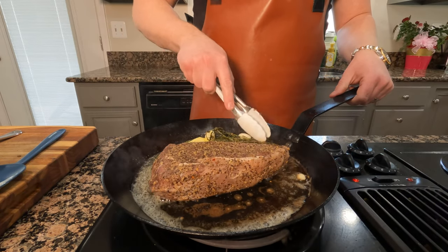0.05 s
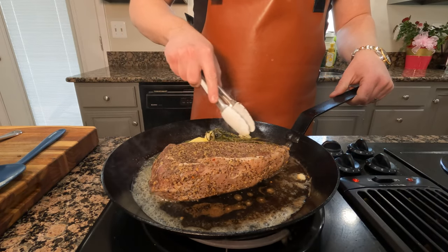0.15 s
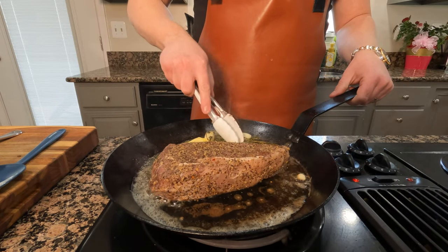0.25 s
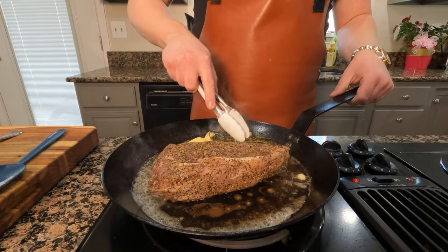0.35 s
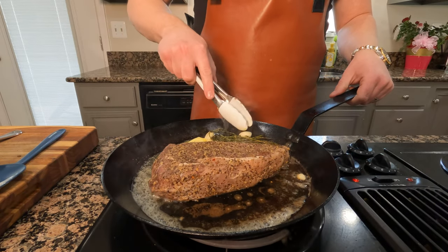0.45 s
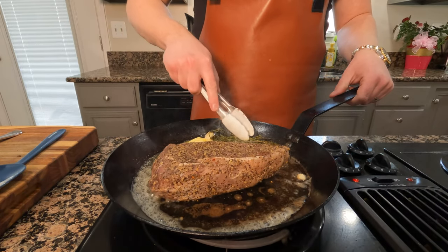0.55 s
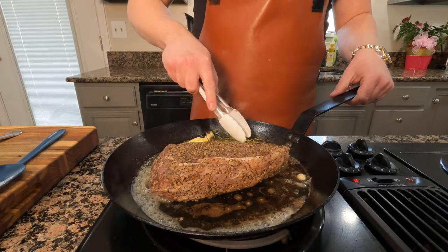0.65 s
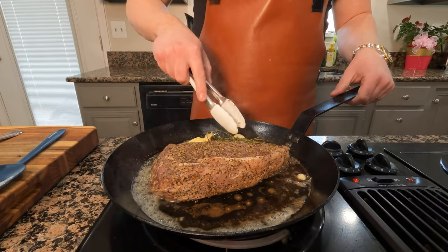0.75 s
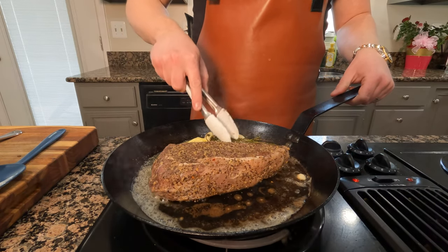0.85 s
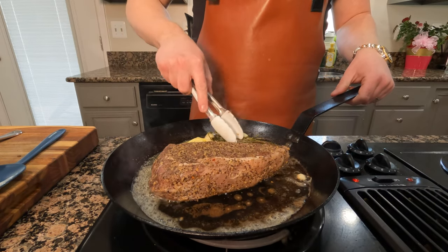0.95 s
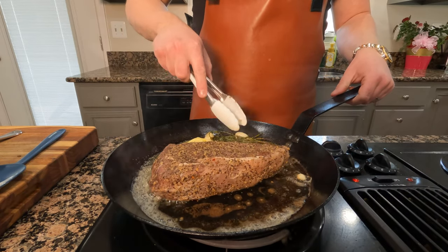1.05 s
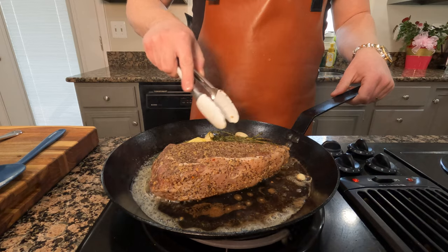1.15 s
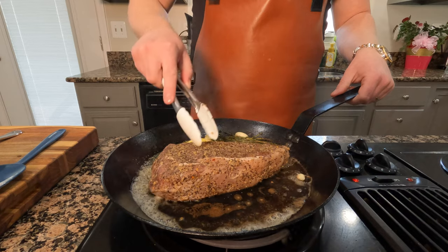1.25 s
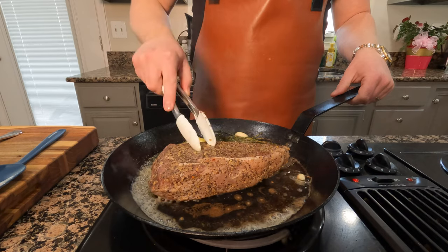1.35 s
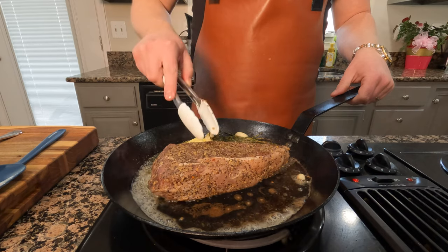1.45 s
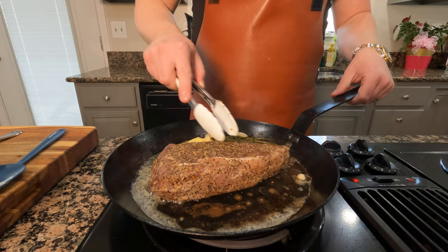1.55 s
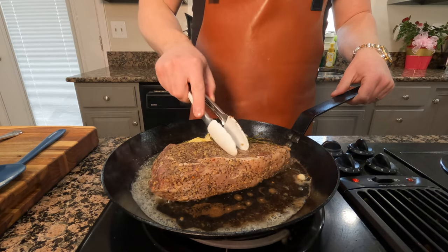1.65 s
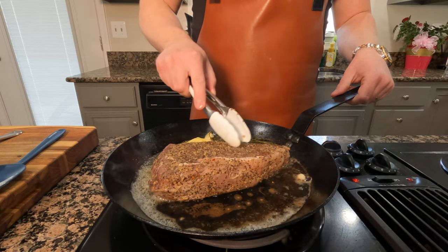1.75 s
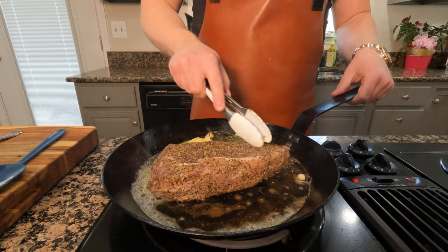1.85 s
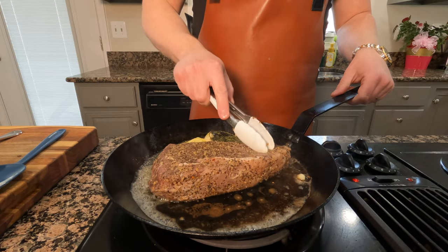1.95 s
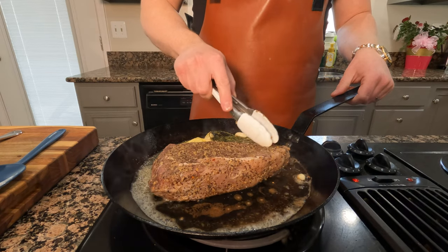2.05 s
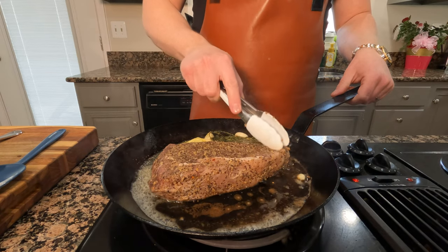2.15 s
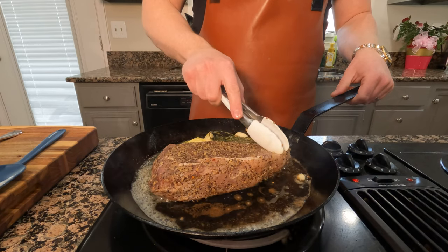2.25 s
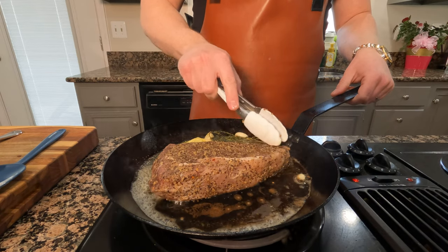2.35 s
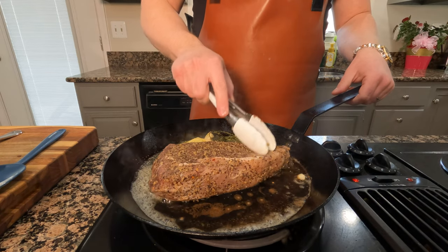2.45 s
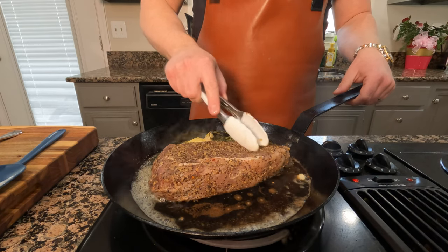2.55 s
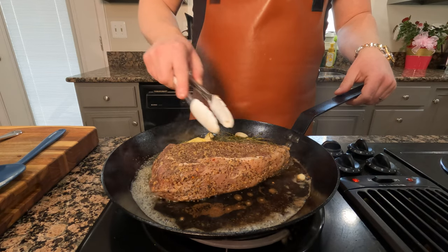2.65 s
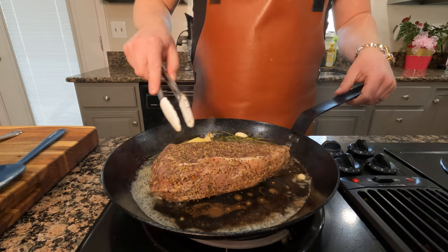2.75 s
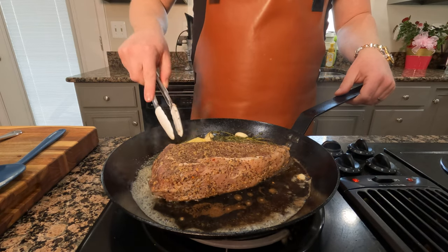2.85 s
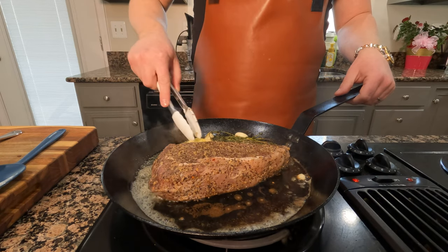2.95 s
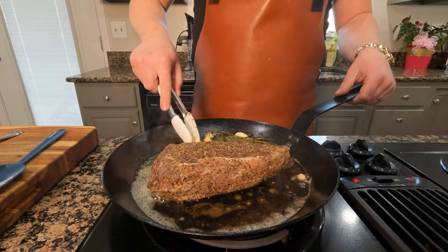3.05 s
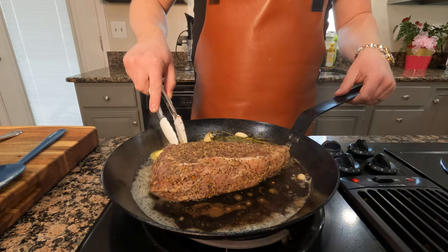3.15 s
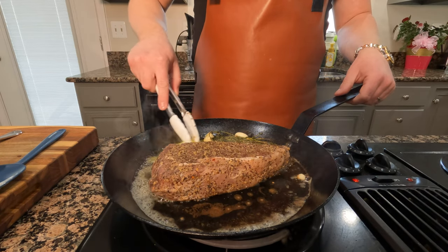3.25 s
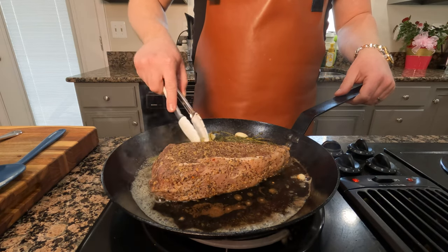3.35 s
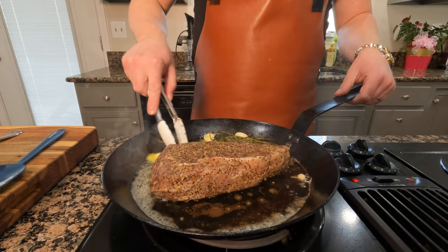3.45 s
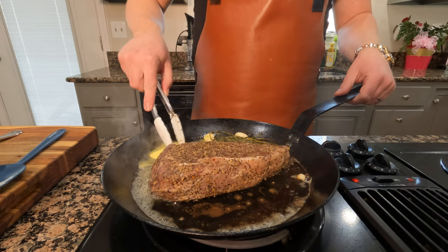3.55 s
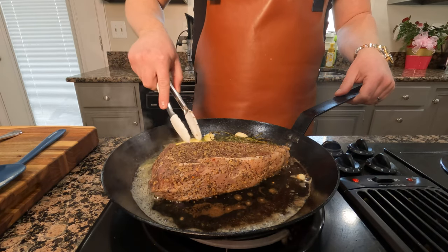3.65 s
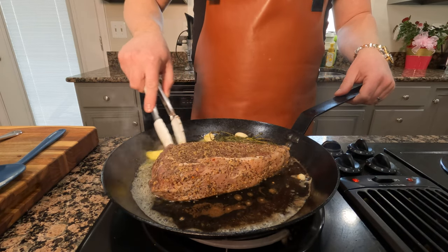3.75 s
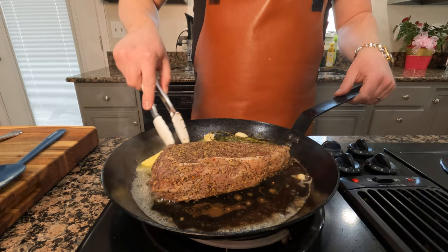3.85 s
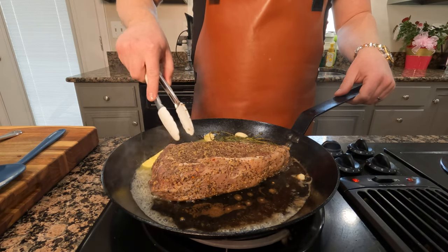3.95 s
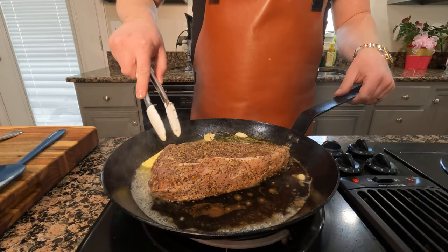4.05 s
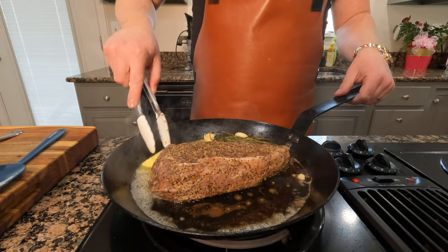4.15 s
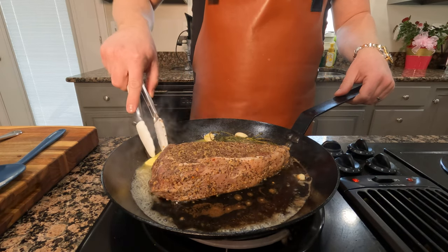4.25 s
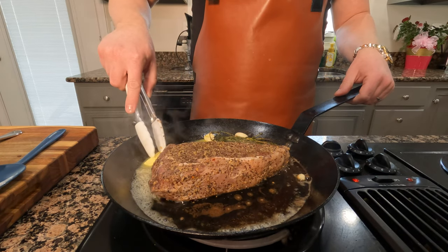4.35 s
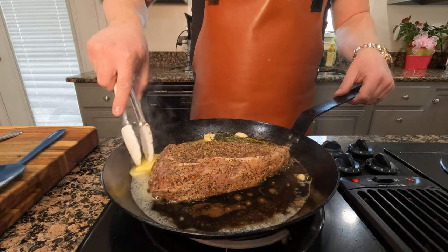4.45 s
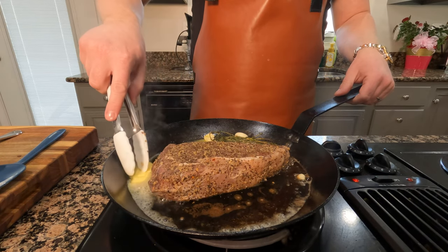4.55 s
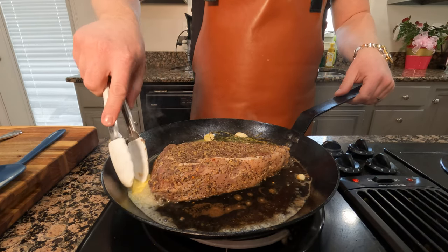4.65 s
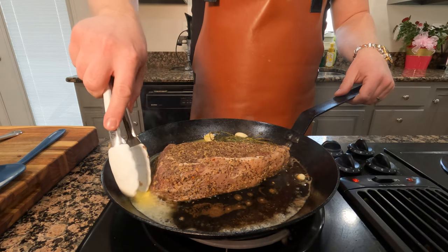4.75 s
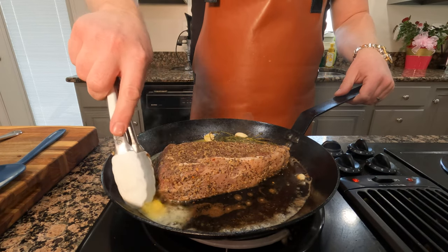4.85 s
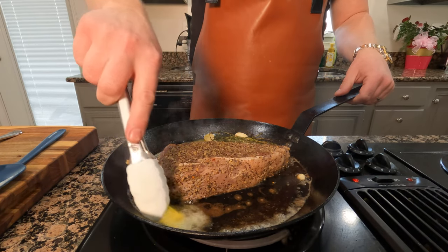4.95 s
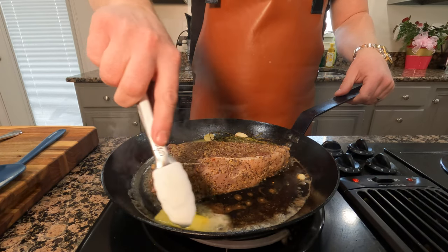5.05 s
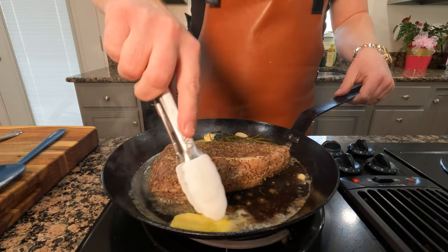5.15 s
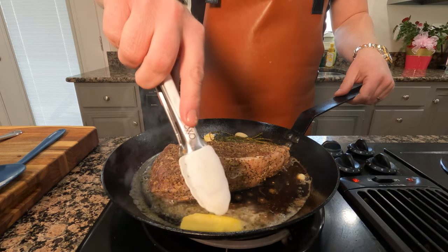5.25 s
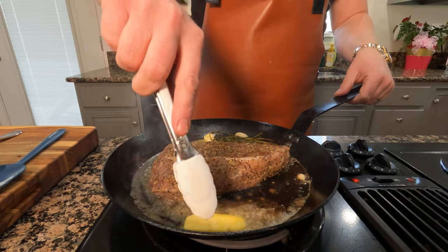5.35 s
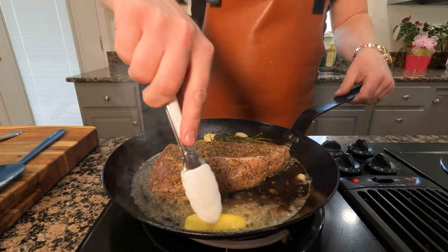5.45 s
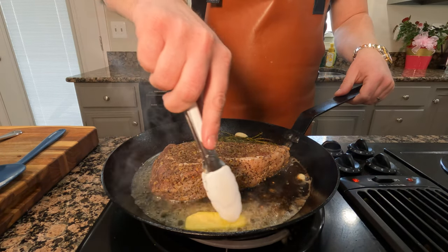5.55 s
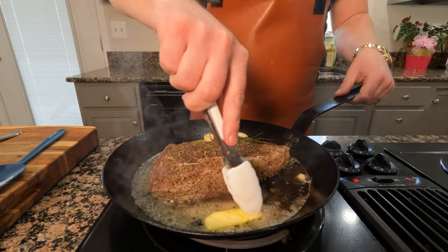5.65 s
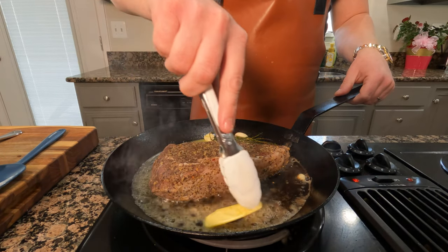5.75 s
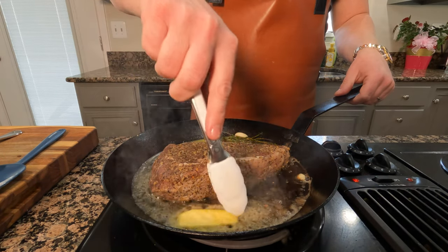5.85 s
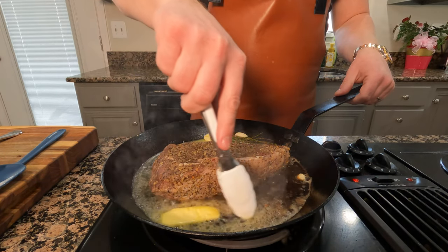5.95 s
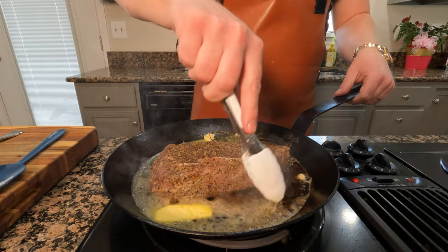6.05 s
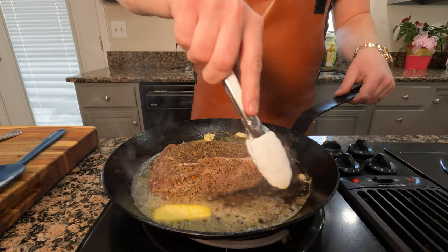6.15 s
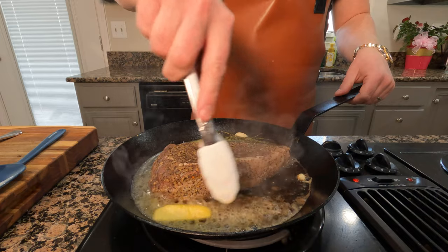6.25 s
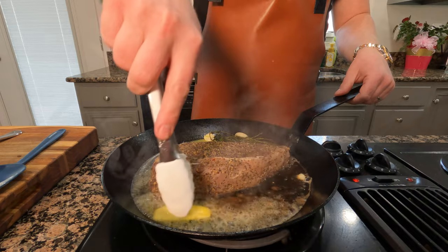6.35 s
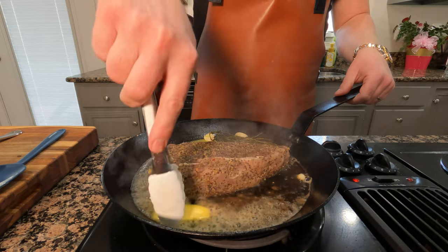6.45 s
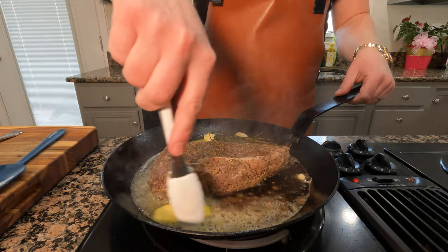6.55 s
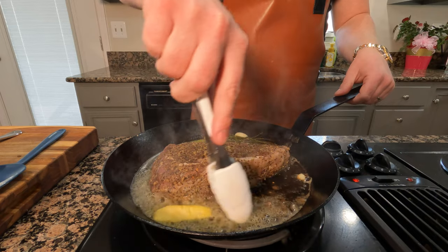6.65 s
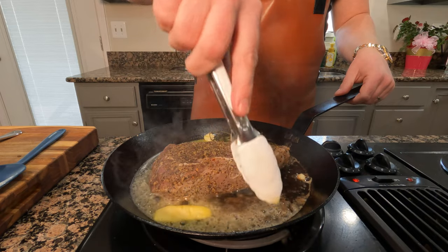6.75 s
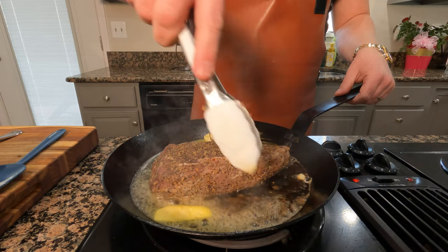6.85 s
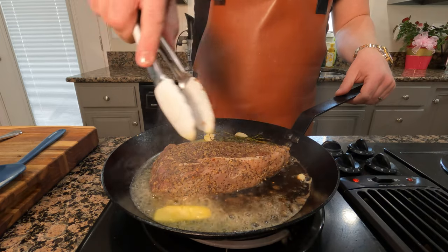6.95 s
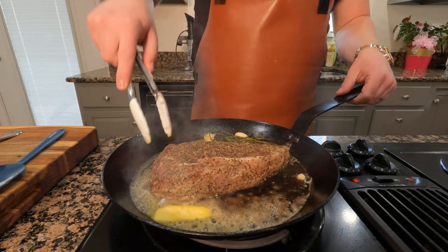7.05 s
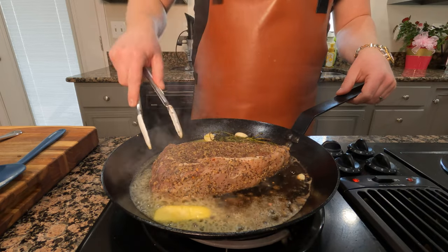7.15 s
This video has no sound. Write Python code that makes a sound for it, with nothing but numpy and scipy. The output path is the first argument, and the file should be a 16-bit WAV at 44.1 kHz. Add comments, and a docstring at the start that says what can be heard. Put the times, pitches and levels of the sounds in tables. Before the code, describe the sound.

Close, bright frying sizzle with loud wet pops slowly settles, then surges as butter is pushed around the hot iron pan, easing again afterward.

```python
"""A steak sears in a cast iron skillet, close by: random clicks, filtered into bands by bubble size.
Single pops (water drops) and duller plops (pockets of fat) are band-limited collapses with a spray tail.
The sear slowly settles but surges whenever the fat is stirred; from 4.85 s butter melts and is pushed
around the pan, and each push makes it foam in a louder, denser sizzle.
Behind it a kitchen fan drones: shaped noise plus wavering low sines."""
import sys
import numpy as np
from scipy import signal
from scipy.fft import rfft, irfft
from scipy.io import wavfile
from scipy.ndimage import uniform_filter1d, minimum_filter1d

SR = 44100
rng = np.random.default_rng(int(sys.argv[2]) if len(sys.argv) > 2 else 0)


def to_wav(s):
    """Save 16-bit WAV."""
    ch = np.atleast_2d(s).T  # columns
    pcm = np.round(np.clip(ch, -1, 1) * 32767)  # PCM
    wavfile.write(sys.argv[1], SR, pcm.astype(np.int16))


N = 317520


def gain_of(db):
    """Decibels to amplitude."""
    return 10 ** (np.asarray(db) / 20)


def evened(x):
    """Scales to an rms of 1."""
    return x / np.sqrt(np.mean(x ** 2) + 1e-20)


def read(points, hz):
    """Interpolates a (f/Hz, value) table on a log-frequency axis."""
    f, value = np.transpose(points)
    return np.interp(np.log(hz + 1), np.log(f + 1), value)


def bins(size=N):
    """Spectrum bin frequencies in Hz for a signal of this length."""
    return np.fft.rfftfreq(size, 1 / SR)


def filtered(x, response):
    """Applies a frequency response to a full-length signal."""
    return irfft(rfft(x) * response, N)


def bell(hz, centre_hz, octaves):
    """Gaussian on a log-frequency axis; octaves is its standard deviation."""
    return np.exp(-.5 * (np.log2((hz + 1) / centre_hz) / octaves) ** 2)


def wander(rate_hz):
    """Slow noise of rms 1, falling off above rate_hz."""
    return evened(filtered(rng.standard_normal(N), 1 / (1 + (bins() / rate_hz) ** 2)))


def add(mix, t_s, sound):
    """Mixes a sound in, centred on time t_s."""
    start = round(t_s * SR) - len(sound) // 2
    part = mix[max(start, 0):max(start + len(sound), 0)]
    part += sound[max(-start, 0):][:len(part)]


# fan air noise, relative density: f/Hz, level/dB per Hz
FAN_AIR = [(20, -33), (50, -27), (80, -14), (125, -7.5), (155, 1.5), (210, -1), (280, -1.5), (380, -8),
           (700, -5), (2000, -18), (16000, -32)]
FAN_RMS_DB = -48
# fan drones: mean f/Hz, rms level/dB
FAN_DRONES = [(111, -71.5), (151, -61.5), (179, -61), (222, -62.5), (268, -74)]


def fan(waver_hz=3.54):
    """Low rush of air as shaped noise, with narrow drones whose frequency wavers."""
    air = filtered(rng.standard_normal(N), gain_of(read(FAN_AIR, bins())))
    out = gain_of(FAN_RMS_DB) * evened(air)
    for hz, db in FAN_DRONES:
        phase = 2 * np.pi * np.cumsum(hz + waver_hz * wander(9.0)) / SR
        out += gain_of(db) * evened(np.sin(phase))
    return out


def kitchen(x, t60_s=0.29, size=12000):
    """Diffuse room tail: decaying noise of unit energy, starting after 2 ms."""
    t = np.arange(size) / SR
    tail = rng.standard_normal(size) * gain_of(-60 * t / t60_s) * (t > .002)
    return signal.oaconvolve(x, tail / np.linalg.norm(tail))[:N]


def burst(pitch_hz, octaves, spray_db, spray_s, size=2048):
    """One collapse of a cycle or two, peak 1, then a quickly dying spray of droplets."""
    t = (np.arange(size) - size // 2) / SR
    band = bell(bins(size), pitch_hz, octaves)
    snap = irfft(band * rfft(-1. * (t == 0)))
    after = t > 1 / pitch_hz  # spray starts once the bubble has collapsed
    spray = irfft(band * rfft(rng.standard_normal(size) * after * np.exp(-abs(t) / spray_s)))
    spray *= np.linalg.norm(snap) / np.linalg.norm(spray)
    return (snap + gain_of(spray_db) * spray) / abs(snap).max()


DROPS_PER_S, DROP_OVER_SIZZLE_DB = 16, 14.5
DROP_HZ, DROP_SPREAD_OCTAVES = 4200, .55  # spread is +/-
FOAM_MUFFLES_DB = 8.5  # drops burst more softly under butter foam


def small_drops(count=200):
    """Rows (t/s, level/dB, f/Hz) of chance water drops, louder in a harder boil."""
    gap, pitch = rng.random((count, 2)).T
    t_s = np.cumsum(-np.log(1 - gap)) / DROPS_PER_S
    db = boiling(t_s)[0] + DROP_OVER_SIZZLE_DB - FOAM_MUFFLES_DB * melted(t_s)
    return zip(t_s, db, DROP_HZ * 2 ** (DROP_SPREAD_OCTAVES * (2 * pitch - 1)))


# largest water drops bursting in the fat: t/s, level/dB before pop_db, nominal f/Hz
WATER_POPS = [(.2586, -3.5, 4090), (0.449, -4, 4020), (.4642, -8, 3340), (0.4667, -3, 3700),
              (.639, -0.5, 3940), (.7173, -3, 2980), (.8764, -4.5, 5030), (.921, 1.5, 3730),
              (1.152, -8.5, 3760), (1.1811, -6, 3930), (1.637, 2.5, 4100), (1.836, -3.5, 3860),
              (2.0087, -8.5, 6430), (2.072, -5.5, 3850), (2.187, -7, 5700), (2.267, -4, 4600),
              (2.339, -6, 3880), (2.4946, -5.5, 4800), (2.5979, -6, 4840), (2.7906, -3.5, 4700),
              (2.793, 3, 4170), (2.9998, -5, 3270), (3.1784, -8, 2830), (3.6808, -2, 4620),
              (3.7667, -6.5, 3220), (3.8577, -3.5, 3860), (4.3363, 4, 5300), (4.351, -1.5, 5500),
              (4.3751, -4, 3940), (5.109, 2.5, 3170), (5.142, .5, 3420), (5.273, -6, 3180),
              (5.3154, -5, 2970), (5.4297, 1.5, 3600), (5.578, 3, 3900), (5.716, 4, 5270),
              (6.459, -2.5, 5840)]
# steam pockets breaking out of the fat: t/s, level/dB before plop_db, nominal f/Hz
FAT_PLOPS = [(.259, -22, 1320), (.465, -15.5, 1150), (.639, -17, 1090), (.707, -22.5, 925),
             (.947, -18, 1190), (1.336, -19.5, 1100), (1.524, -20, 1290), (1.638, -18, 960),
             (1.933, -18.5, 1030), (2.073, -14, 1170), (2.187, -22.5, 810), (2.266, -17.5, 1260),
             (2.339, -20.5, 1290), (2.44, -21.5, 1070), (3.353, -23, 1290), (3.766, -19.5, 1450),
             (4.037, -18, 1120), (4.117, -23, 1160), (4.416, -20.5, 1040), (5.018, -21.5, 940),
             (5.316, -19.5, 900), (5.58, -19.5, 477), (6.459, -18, 1050), (6.52, -21, 1190),
             (7.051, -18, 1070)]


def spatter(pop_db=1.0, plop_db=3.0, dull_hz=13500):
    """Single pops, large and small, and duller plops; the fat softens their highest treble."""
    out = np.zeros(N)
    for t_s, db, hz in WATER_POPS:
        pop = burst(hz * .9, octaves=0.61, spray_db=-1.5, spray_s=0.00097)
        add(out, t_s, gain_of(db + pop_db) * pop)
    for t_s, db, hz in FAT_PLOPS:
        plop = burst(hz * .75, octaves=0.82, spray_db=-5.5, spray_s=0.0082)
        add(out, t_s, gain_of(db + plop_db) * plop)
    for t_s, db, hz in small_drops():
        add(out, t_s, gain_of(db) * burst(hz, octaves=0.47, spray_db=-4, spray_s=0.00038))
    return filtered(out, 1 / np.sqrt(1 + (bins() / dull_hz) ** 8))


BUTTER_S, MELT_S = 4.85, 0.36  # onset, rise time


def melted(t):
    """Share of the butter that is foaming, 0 to 1."""
    return np.clip((t - BUTTER_S) / MELT_S, 0, 1)


# fine = extra share of fine fizz, coarse = extra share of coarse bubbling
SEAR_DB, SEAR_FINE_DB, SEAR_COARSE_DB = -25.5, 2.6, 1.6
SETTLE_DB_PER_S = 0.77  # the sear calms as the surface dries
BUTTER_DB, BUTTER_FINE_DB, BUTTER_COARSE_DB = -26.5, 2, 0.5
SWELL_SHARE, SUBSIDE_S = .36, 0.039  # rise as share of length; decay time constant
# wet fat or butter meeting hot iron: start t/s, length/s, level/dB, fine/dB, coarse/dB
STIR_SURGES = [(0.438, 0.025, -27, 2, 4), (0.563, .07, -29, 11, -11), (1.298, .36, -34.5, 4, 7.5),
               (1.9, .11, -28.5, 3, 10), (2.198, .25, -36, 2, 7), (2.741, 0.044, -29.5, 3, -4),
               (4.02, .27, -31.5, 5, 2), (4.406, 0.034, -26, 3, 2), (4.478, .45, -33, 2.5, 2),
               (4.869, 0.46, -19.5, -9, -2), (5.291, .28, -18, -3.5, -1), (5.618, .08, -20, -4.5, -1.5),
               (5.757, 0.36, -25.5, -5, -2), (6.138, .36, -29, 7.5, 2), (6.839, .35, -32.5, 9, 4)]


def boiling(t):
    """Sear, butter and surges add in power; returns level, fine and coarse shares in dB."""
    parts = [(1, SEAR_DB - SETTLE_DB_PER_S * t, SEAR_FINE_DB, SEAR_COARSE_DB),
             (melted(t), BUTTER_DB, BUTTER_FINE_DB, BUTTER_COARSE_DB)]
    for start_s, length_s, *levels_db in STIR_SURGES:
        swell = np.clip((t - start_s) / (SWELL_SHARE * length_s), 0, 1)
        subside = np.exp(-np.maximum(t - start_s - length_s, 0) / SUBSIDE_S)
        parts.append((swell * subside, *levels_db))
    whole = fine = coarse = 0
    for envelope, db, fine_db, coarse_db in parts:
        power = (envelope * gain_of(db)) ** 2
        whole = whole + power
        fine = fine + power * gain_of(fine_db) ** 2
        coarse = coarse + power * gain_of(coarse_db) ** 2
    return 10 * np.log10([whole, fine / whole, coarse / whole])


def bursts(per_s, spread_db):
    """Clicks of rms 1 at a changing rate; most are small, and sizes stay within a limited range."""
    chance, depth, sign = rng.random(N), rng.exponential(1, N), rng.choice([-1., 1.], N)
    size = gain_of(spread_db * (depth % 4)) * sign  # depths past 4 wrap round
    return evened(size * (chance < per_s / SR))


def bubbles(activity, tint, per_s, spread_db, octaves, patch_db, count):
    """Spectrum of a swarm of bubbles in several sizes, whose bands sum to flat power."""
    pitches_hz = np.geomspace(400, 12000, count)
    bands = np.array([bell(bins(), hz, octaves) for hz in pitches_hz]) + 1e-9
    bands /= np.linalg.norm(bands, axis=0)
    spectrum = 0
    for hz, band in zip(pitches_hz, bands):
        flurries = gain_of(patch_db * wander(30)) ** 2
        rate = per_s * np.sqrt(hz / 3000) * activity * flurries  # small bubbles outnumber large
        spectrum += band * rfft(tint(hz) * bursts(rate, spread_db))
    return spectrum


# sizzle spectrum, relative density: f/Hz, level/dB per Hz
SIZZLE_COLOUR = [(120, -48), (200, -26.5), (273, -13), (379, -18.5), (946, -11.5), (1200, -9.5),
                 (1490, -8.5), (1640, -6.5), (2280, -6), (2630, -2.5), (3660, 2), (7070, -10), (8960, -23),
                 (10600, -16.5), (15800, -38.5)]
# pan colour peaks and dips: f/Hz, width/Hz at half the dB, level/dB
PAN_PEAKS = [(1290, 300, 2.5), (1485, 85, -4.5), (1750, 420, 2), (2270, 280, -0.5), (2580, 530, 4),
             (3460, 490, 0.5), (7170, 540, 2.5), (9200, 340, 0), (11900, 430, 3.5), (13300, 2100, -6)]


def pan_colour(hz):
    """Amplitude spectrum of the sizzle, scaled by the power in its loudest band."""
    peaks_db = sum(db / (1 + (2 * (hz - f) / width) ** 2) for f, width, db in PAN_PEAKS)
    colour = gain_of(read(SIZZLE_COLOUR, hz) + peaks_db)
    main = (hz > 1800) & (hz < 6000)
    return colour / np.sqrt(np.mean(colour ** 2 * main))


FOAM_HZ, FOAM_OCTAVES, FOAM_DB = 5500, 0.35, 2  # butter foam favours one small bubble size


def sizzle(fizz_db=-3.0, crackle_db=-5.0, spits_db=-7.5, clump_db=0.76):
    """Bubbles burst in clumps; a harder boil makes more fizz, bigger bubbles and bigger droplets."""
    t = np.arange(N) / SR
    coarse_t = t[::100]
    boil_db, fine_db, coarse_db = [np.interp(t, coarse_t, row) for row in boiling(coarse_t)]
    boil = gain_of(boil_db)
    butter = melted(t)
    activity = evened(boil * gain_of(clump_db * wander(45))) ** 2

    def tint(hz):
        """Gain over time of bubbles of this pitch."""
        foam_db = FOAM_DB * bell(hz, FOAM_HZ, FOAM_OCTAVES) * butter
        fine_share = read([(3600, 0), (8500, 1)], hz)
        coarse_share = read([(1100, 1), (2600, 0.078)], hz)
        return gain_of(foam_db + fine_db * fine_share + coarse_db * coarse_share)

    def fling(hz):
        """Gain over time of flying droplets, which mostly tick high."""
        tick_db = read([(700, -9), (1500, -5), (3500, -5), (7000, -1), (12000, 1)], hz)
        return np.sqrt(evened(boil)) * tint(hz) * gain_of(tick_db)

    # crackle bubbles grow more than they multiply in a harder boil
    crowd = evened(activity ** .15) ** 2
    growth = np.sqrt(activity / crowd)

    def grown(hz):
        """Gain over time of crackling bubbles."""
        return growth * tint(hz)

    fizz = bubbles(activity, tint, per_s=2400, spread_db=3.5, octaves=0.31, patch_db=1.16, count=12)
    crackle = bubbles(crowd, grown, per_s=1100, spread_db=5.0, octaves=1.0, patch_db=1.5, count=5)
    spits = bubbles(1, fling, per_s=15, spread_db=3.3, octaves=.55, patch_db=4, count=6)
    spectrum = gain_of(fizz_db) * fizz + gain_of(crackle_db) * crackle + gain_of(spits_db) * spits
    return np.sqrt(np.mean(boil ** 2)) * irfft(spectrum * pan_colour(bins()), N)


# side gain of the diffuse sound, i.e. difference between the ears: f/Hz, level/dB
SIDE_WIDTH = [(100, -30), (600, -31), (1500, -47), (3000, -72), (7000, -49), (10700, -22.5), (12000, -2.5),
              (14000, 0), (15500, -1)]


def scene(room_db=-16):
    """All sources dead centre; only a little room sound spreads sideways."""
    near = fan() + spatter() + sizzle()
    mid = near + gain_of(room_db) * kitchen(near)
    side = filtered(kitchen(near, t60_s=0.12), gain_of(read(SIDE_WIDTH, bins())))
    return np.array([mid + side, mid - side])


NOTCH_HZ, CEILING_DB, EDGE_HZ = 9020, -.4, 15790


def record(dry, notch_q=34, recover_db_per_s=110):
    """Narrow treble notch, peak limiter that ducks the mix after the biggest pops, then low-pass."""
    notch = signal.iirnotch(NOTCH_HZ, notch_q, SR)
    x = signal.lfilter(*notch, dry)
    x = signal.lfilter(*notch, x)  # twice, for steeper sides
    over_db = np.maximum(20 * np.log10(abs(x).max(0) + 1e-9) - CEILING_DB, 0)
    fall_db = np.arange(N) * recover_db_per_s / SR
    duck_db = np.maximum.accumulate(over_db + fall_db) - fall_db
    smooth_db = uniform_filter1d(minimum_filter1d(-duck_db, size=41), size=41)
    low_pass = signal.firwin(1023, EDGE_HZ, window=("kaiser", 9), fs=SR)
    return signal.oaconvolve(x * gain_of(smooth_db), low_pass[None], "same")


dry = scene()
out = record(dry)
to_wav(out)
```